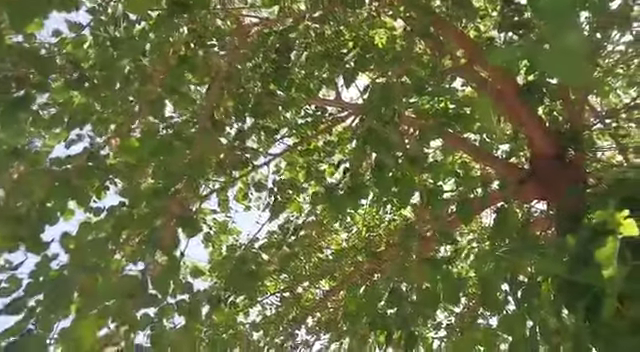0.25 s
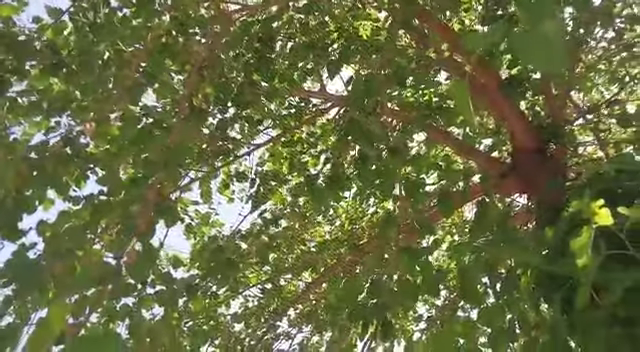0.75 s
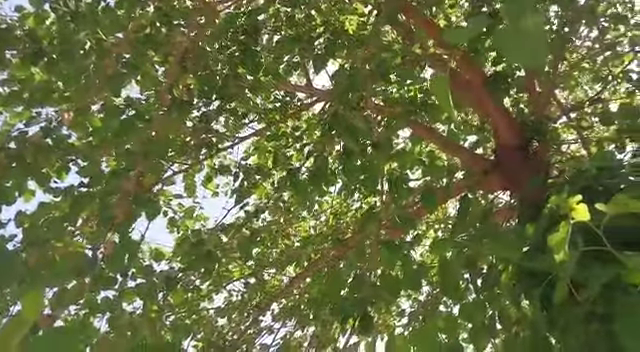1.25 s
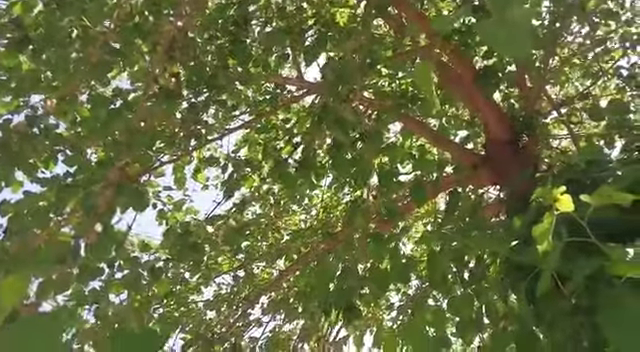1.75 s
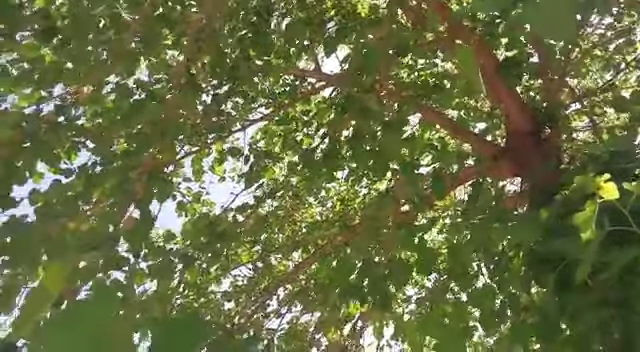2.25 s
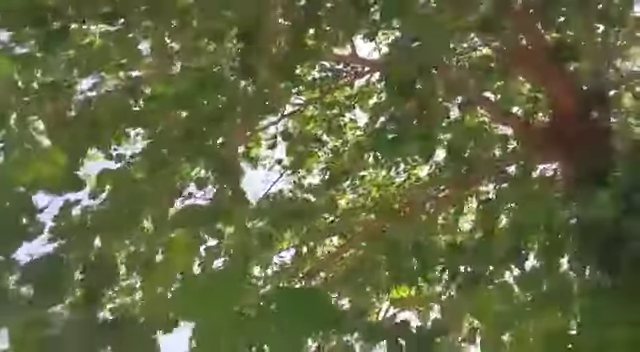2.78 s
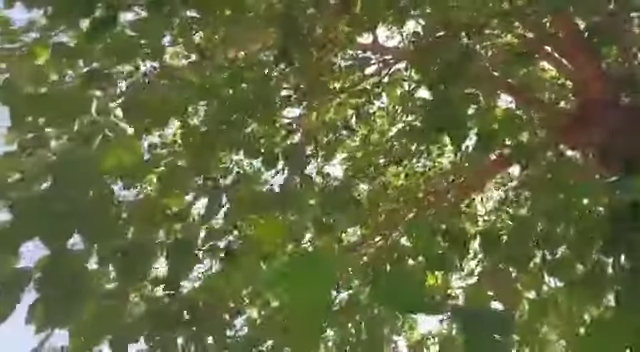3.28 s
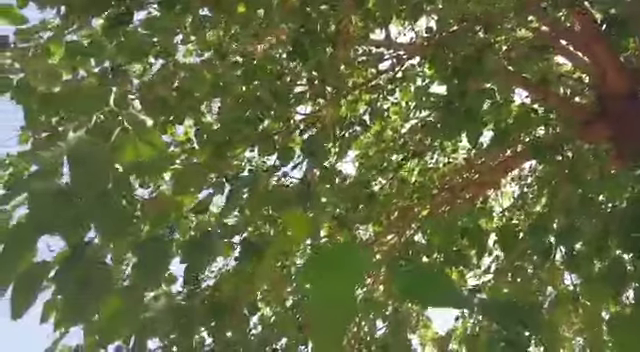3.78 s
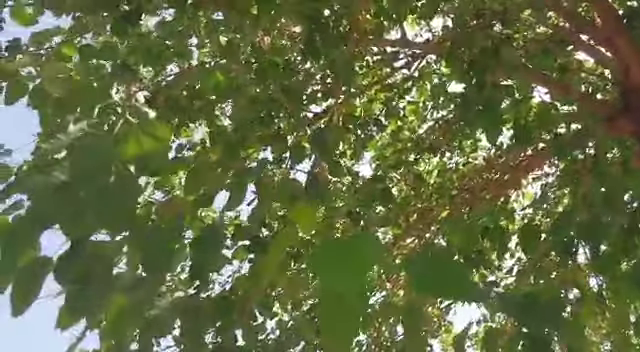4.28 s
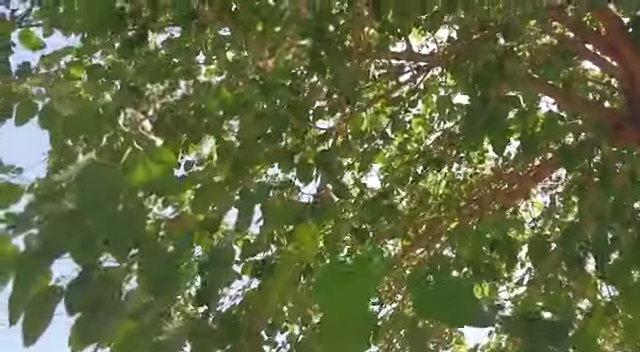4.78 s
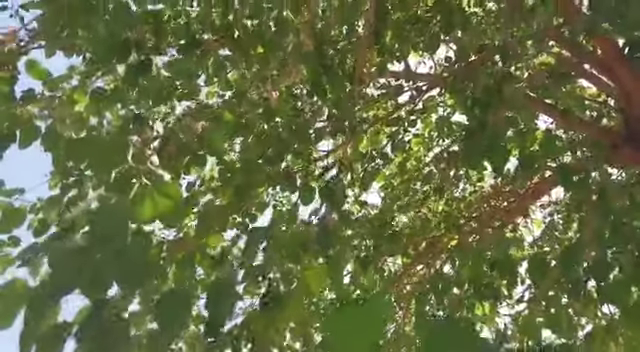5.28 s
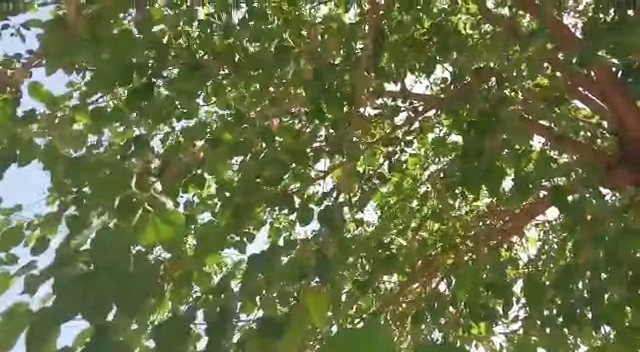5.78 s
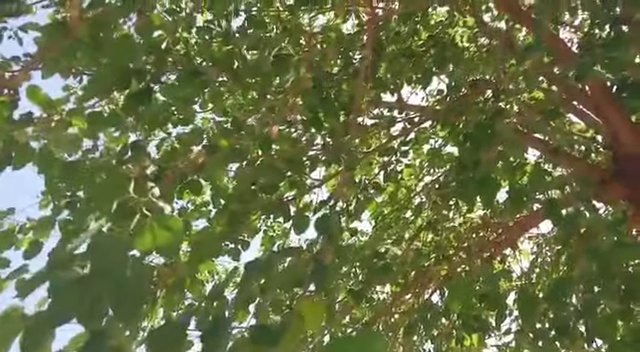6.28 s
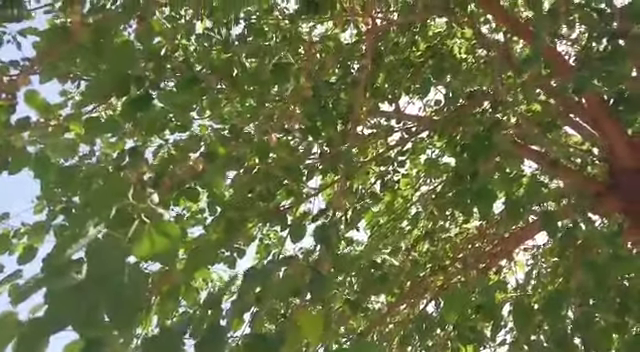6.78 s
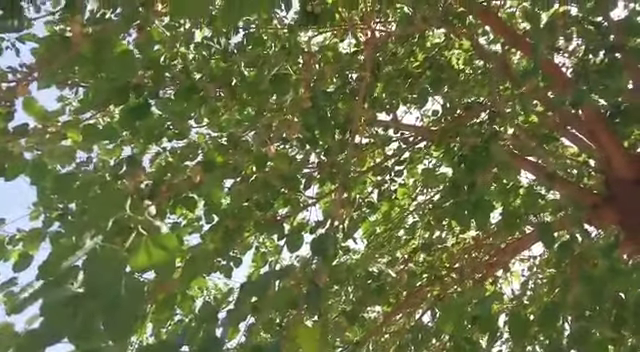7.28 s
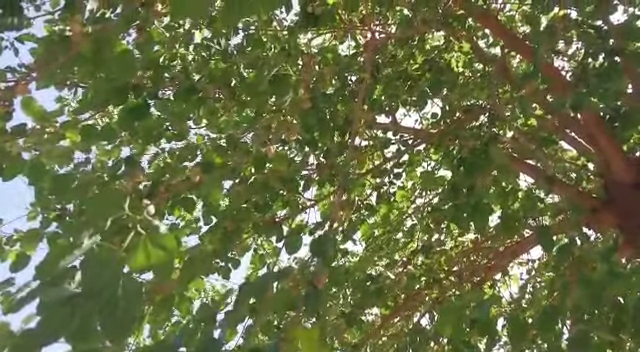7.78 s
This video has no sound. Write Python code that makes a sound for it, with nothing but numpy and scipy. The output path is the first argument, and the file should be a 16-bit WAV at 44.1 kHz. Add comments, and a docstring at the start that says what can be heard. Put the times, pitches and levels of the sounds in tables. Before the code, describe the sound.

Outdoors under a leafy tree, small birds such as sparrows call throughout. Loud, quick, buzzy chirrups stand out at irregular gaps, between softer chips, double chirps and thin high peeps. A far flock twitters in faint waves, and one bird holds a weak thin whistle midway. Distant town rumble with light airy hiss lies underneath. Stereo pickup, nearest birds close and clear, with short leafy echoes.

```python
"""A far flock chatters over a town's low rumble, with thin calls; soon sparrows chirp loudly in a leafy tree.
Each chirp is a zigzag whistle, most with an upper line, plus weak overtones and a rasp of breath noise.
Twigs, leaves and walls scatter the chirps as showers of small echoes; one bird holds a long thin whistle.
The flock is thousands of short random glides, and the town is coloured noise, all heard at two ports."""
import sys
import numpy as np
from scipy import signal
from scipy.fft import rfft, irfft
from scipy.io import wavfile
from scipy.ndimage import uniform_filter1d

SR = 44100
rng = np.random.default_rng(int(sys.argv[2]) if len(sys.argv) > 2 else 0)


def linear_from_db(decibels):
    """Turn decibels (scalar or array-like) into linear amplitude factors; 0 gives 1."""
    return 10 ** (np.asarray(decibels, float) / 20)


def to_wav(s):
    """Save 16-bit WAV."""
    ch = np.atleast_2d(s).T  # columns
    pcm = np.round(np.clip(ch, -1, 1) * 32767)  # PCM
    wavfile.write(sys.argv[1], SR, pcm.astype(np.int16))


N = 355005  # length in samples

# the held whistle, before its wavering: (t/s, f/Hz, level/dB)
HELD = [(4.44, 3380, -70), (4.6, 3430, -70), (4.85, 3435, -68), (5.1, 3430, -68), (5.32, 3450, -69),
        (5.42, 3450, -74)]
# the far flock, before each note's own random lift: (t/s, level/dB)
FLOCK = [(0, -50.5), (.25, -49.5), (.4, -76), (1.2, -53.5), (1.55, -78.5), (2.05, -54.5), (2.78, -66),
         (3.15, -56.5), (3.36, -70.5), (3.8, -53.5), (4.4, -68.5), (4.72, -54), (5.15, -58), (5.3, -56.5),
         (6.15, -69.5), (6.3, -55), (7.2, -73), (7.42, -48.5), (7.75, -98), (8.05, -49)]
# the town: (t/s, level of the rumble before a small wander/dB, swell of the hiss above 850 Hz/dB)
TOWN = [(0.0, -54.5, 4), (1.86, -55, 6), (1.9, -52, 6), (3.09, -56, 1.5), (3.56, -54, 2.5),
        (4.71, -56.5, 1.5), (4.87, -49.5, -8), (5.0, -56, -0.5), (7.71, -56.5, 2.5), (8.05, -51.5, -2)]
# tone colour of the town, before its overall level is set: (f/Hz, level/dB)
TOWN_COLOUR = [(15, -62), (25, -13), (45, -2), (110, 1), (220, -0.5), (340, -10.5), (600, -7), (800, -23),
               (1250, -31), (1600, -25), (2000, -34.5), (4000, -25.5), (8000, -48.5), (11000, -47),
               (16000, -48)]
# how alike the town is at both ports: (f/Hz, correlation from 0 to 1)
TOWN_LIKENESS = [(30, 0.75), (60, 0.81), (130, 0.92), (290, 0.58), (640, 0.0068)]
# sideways balance of the town: (f/Hz, left minus right/dB)
TOWN_BALANCE = [(60, -0.5), (380, -3), (1290, -7), (2380, -3), (8000, 2.5)]
# colour of the birds' rasp and overtones: (f/Hz, level/dB)
BIRD_TREBLE = [(2000, -27), (3500, -15.5), (5500, -12), (7200, -12), (8400, -28), (11200, -13.5),
               (13000, -22), (15500, -16.5)]
# second to fourth partial, before distance and the colour of the treble: level/dB
OVERTONES_DB = [-15, -8, -17]

# contours of the main line (MAIN) and of an upper line (SECOND): in the chirrup, the octave of its
# rising onset; elsewhere perhaps a second voice. Before each call's own pitch and level:
# (t from the call's start/s, f/Hz, level/dB)
CHIRRUP_MAIN = [(-.024, 2050, -46), (-.002, 2450, -40), (.005, 2950, -24), (.011, 4250, -9),
                (.021, 4700, -4), (.026, 5100, -3), (.032, 3400, -10), (.040, 3680, -2), (.046, 3680, -2),
                (.051, 3100, -10), (.056, 3800, 0), (.062, 3900, -1), (.067, 2800, -16), (.076, 2900, -14),
                (.084, 3380, -6), (.093, 3650, 0), (.098, 4100, -4), (.107, 2850, -8), (.114, 3300, -6),
                (.122, 2800, -18), (.129, 2950, -11), (.135, 2550, -20)]
CHIRRUP_SECOND = [(-.045, 4025, -35), (-.026, 4220, -17), (-.010, 4600, -4.5), (.002, 5300, -9.5),
                  (.009, 6115, 5)]
DOUBLE_MAIN = [(.003, 3200, -22), (.008, 3950, -10), (.016, 4330, 0), (.020, 4700, -1), (.026, 3650, -5),
               (.035, 3330, -4), (.042, 2800, -14), (.048, 2700, -16), (.056, 3120, -5), (.062, 3500, -5),
               (.068, 3000, -4), (.074, 2700, -10), (.080, 2350, -18)]
DOUBLE_SECOND = [(-.012, 3890, 4), (-.002, 5350, 7.5), (.006, 6200, -34.5)]
CHIP_MAIN = [(.002, 3350, -5), (.010, 4000, -23), (.018, 4805, -1.5), (.024, 4800, -19), (.031, 3747, -9.5),
             (.040, 3290, -14.5), (.047, 2750, -29), (0.06, 2680, -19), (0.076, 2514, -36)]
CHIP_SECOND = [(-.010, 4150, -6), (-.001, 5530, -0.5), (.006, 6600, -1)]
CHURR_MAIN = [(.004, 3180, -15), (.010, 4200, -1.5), (.018, 4500, -21.5), (.024, 4150, 1.5),
              (0.031, 3650, -2), (.042, 3150, -23), (0.055, 2990, -11), (0.072, 2540, -38)]
CHURR_SECOND = [(-.014, 4370, -29), (.000, 5800, -8), (.008, 4750, -18.5), (.016, 5087, -6),
                (.026, 4413, -1), (.036, 4170, -7.5), (.046, 3808, -11.5), (0.059, 3500, -9),
                (.070, 3130, -10)]
ANSWER_MAIN = [(-.004, 3300, -18), (.006, 4650, -7), (.018, 5300, -6), (.027, 3950, -3), (.040, 4300, -2),
               (.048, 4750, -5), (.056, 3300, -7), (.070, 3950, 0), (.085, 4850, -8), (.093, 3350, -6),
               (.103, 3550, -6), (.114, 2800, -13)]
ANSWER_SECOND = [(-.022, 5470, 3), (-.006, 6050, -15.5), (.002, 4760, -25), (.010, 5700, -0.5),
                 (0.022, 5610, -7)]
ARCH_MAIN = [(.002, 1837, -23.5), (.028, 2300, -5), (.046, 2900, -17), (0.058, 3400, -14),
             (0.07, 2766, -6.5), (.090, 2520, -2), (.112, 2355, 4.5), (.132, 2110, -11.5)]
LONG_MAIN = [(-.012, 4300, -16), (.012, 4500, 0), (.032, 3800, -2), (.055, 3300, -5), (.075, 2600, -15),
             (.092, 4000, -7), (.108, 2900, -11), (.130, 3550, -7), (.150, 2650, -15)]
LONG_SECOND = [(-.045, 5800, -8), (-.020, 5000, -4), (.030, 4300, 0), (.065, 3800, 0), (.085, 3400, -8)]
PEEP_MAIN = [(0, 6000, 1.5), (0.015, 6150, -7.5), (.030, 6110, 6.5)]

# the calls of each kind: (t of start/s, main line level/dB, pitch as a share of the contour,
# upper line level/dB, phase by which left leads/rad, extra echo for a bird deep in the leaves/dB)
CHIRRUPS = [(.576, -27, 1.037, -36.5, 4.43, -1.5), (3.553, -30, 0.99, -40, 1.43, -1),
            (4.779, -26.5, 1.0, -34.5, 1.18, 0.5), (7.823, -28, 1.039, -39.5, 1.3, 0)]
DOUBLES = [(1.597, -31, 1.0, -47.5, -2.8, 2.6), (1.691, -32.5, 1, -56, -1.9, 0.94),
           (2.606, -48.5, .94, -61.5, 3.1, 8.8), (6.750, -29.5, 0.96, -53, 2.04, 1.2),
           (6.843, -30, .98, -44.5, 1.2, 0.47)]
CHIPS = [(1.381, -28, 0.99, -56.5, 0.96, 4), (2.493, -34.5, 0.98, -49, -1, 10.5)]
CHURRS = [(1.189, -51, 0.93, -50, 5.2, 10), (1.277, -37.5, 0.91, -34, 2, 4),
          (1.857, -33, .99, -36.5, 3.8, 6.2), (2.815, -36, 0.98, -37, 1.1, 4.8),
          (3.887, -33, 0.96, -35.5, 1.26, 3.3), (5.49, -60, 1, -75, 1.2, 6.6),
          (7.062, -37, 0.93, -37, 0.63, 2.1), (7.995, -45.5, .97, -57, 2.1, 8)]
ANSWERS = [(1.004, -45, 1.0, -57.5, 4, 4.8), (2.190, -42, 1.014, -58, 2, 5.2),
           (3.062, -62, 1.19, -76, -2.5, 4.4), (3.412, -45.5, 0.97, -47, 4, 3.4),
           (4.535, -57, .95, -73, 2.2, 4.8), (5.295, -53, 1.014, -62, 3.4, 8),
           (6.422, -52.5, 0.95, -67, 2.5, 5.6), (7.386, -72, 0.81, -79, 18.5, 2.4)]
ARCHES = [(2.340, -53.5, 0.99, 0, 1.4, 1), (4.560, -56.5, 1, 0, 0.98, 1.6), (7.410, -64, 1.0, 0, 4.7, 5)]
LONGS = [(.002, -49.5, 1.0, -50, 2, 4.9), (5.764, -51, .94, -59.5, -2.5, 8.4),
         (6.262, -65, 1.05, -74.5, 3, 5.1)]
PEEPS = [(.066, -61.5, 1.06, 0, 3.5, 5.9), (.450, -60, 1, 0, 4.5, 1), (.472, -58, 0.95, 0, 4.5, 1),
         (.526, -57, 0.99, 0, 4, 1), (.562, -48, 1.07, 0, 3.5, 0.87), (2.935, -61, 1.04, 0, -2.5, 1),
         (3.775, -66, 1.02, 0, 4, 6), (4.244, -62.5, 1.01, 0, 1, 8.6), (4.667, -62, 1.05, 0, 1.8, 2.7),
         (4.757, -49, 1, 0, 1.5, 1.1), (6.925, -59, 0.99, 0, 1, 2), (7.952, -48.5, 0.82, 0, 2.5, 0.7)]
SINGERS = [(CHIRRUPS, CHIRRUP_MAIN, CHIRRUP_SECOND, -0.24, 1.8),
           (DOUBLES, DOUBLE_MAIN, DOUBLE_SECOND, .2, 1), (CHIPS, CHIP_MAIN, CHIP_SECOND, .2, -1.5),
           (CHURRS, CHURR_MAIN, CHURR_SECOND, 0.45, -1.8), (ANSWERS, ANSWER_MAIN, ANSWER_SECOND, 3.8, -1.2),
           (LONGS, LONG_MAIN, LONG_SECOND, 2.4, .2), (ARCHES, ARCH_MAIN, None, -6.5, -4),
           (PEEPS, PEEP_MAIN, None, 0.89, .2)]

# shares a left-minus-right difference between the two ports
PORT_SIDES = np.array([[.5], [-.5]])
EDGE_S, ROUNDING_S = .004, .0015  # fade at the ends of a line; window that rounds the turns in pitch
BREAKS_DB, BREAKS_PER_S = 1.2, 220  # the voice catches: strength and rate of its level wander
UPPER_HOARSE = 1.9  # the upper line is this many times hoarser
OVERTONE_GRAIN, OVERTONE_PAN_DB = 0.8, -3.5  # overtones shiver and lean right
OVERTONE_DB_PER_DB = 0.6  # overtones fade faster than the whistle with distance
RASP_DB_PER_KHZ = 5  # high notes push more air
SLAP_S, SLAP_DB = .012, -17  # one firm echo off a trunk or wall
FLOCK_HZ = 3993  # pitch around which the flock's notes are spread


def curve(table, s, column=1):
    """Reads a table column at times s, with straight lines between the rows."""
    rows = np.array(table, float)
    return np.interp(s, rows[:, 0], rows[:, column])


def shape(points, size):
    """Reads (f/Hz, value) points at every bin of a transform, straight on a log-frequency axis."""
    rows = np.array(points, float)
    bin_hz = np.arange(size // 2 + 1) * SR / size
    return np.interp(np.log(bin_hz + 1), np.log(rows[:, 0]), rows[:, 1])


def walk(rate, size):
    """Random wander around 0 with spread near 1.5, heading for a new value rate times a second."""
    hold = max(int(SR / rate), 1)
    steps = np.repeat(rng.standard_normal(size // hold + 1), hold)
    return 1.84 * uniform_filter1d(steps, hold)[:size]


def add(out, start_s, sound):
    """Mixes a sound in at a time, cutting off what falls outside."""
    i = int(start_s * SR)
    sound = sound[..., max(-i, 0):out.shape[-1] - i]
    out[..., max(i, 0):max(i, 0) + sound.shape[-1]] += sound


def scatter(x, t60_s, db, rise_s):
    """Countless small echoes, different at each port, that build up and then die away exponentially."""
    s = np.arange(int(1.2 * SR)) / SR
    envelope = (1 - np.exp(-s / rise_s)) * linear_from_db(-60 * s / t60_s)
    echoes = rng.standard_normal((2, len(s))) * envelope
    echoes = echoes * linear_from_db(db) / np.sqrt(np.sum(echoes ** 2, axis=1, keepdims=True))
    return signal.fftconvolve(x[None], echoes, axes=1)[:, :N]


def glide(contour, share, strain):
    """A line's slightly unsteady pitch, its rise and fall in loudness, and its hoarse grain."""
    s = np.arange(contour[0][0], contour[-1][0], 1 / SR)
    hz = share * uniform_filter1d(curve(contour, s), max(int(ROUNDING_S * SR), 1))
    fade = np.minimum(1, np.minimum(s - s[0], s[-1] - s) / EDGE_S)
    breaks = linear_from_db(BREAKS_DB * walk(BREAKS_PER_S, len(s)))
    swell = linear_from_db(curve(contour, s, column=2)) * fade * breaks
    # the membranes beat unevenly, which spreads a haze around the line; strained high notes are hoarsest
    hoarse = strain * np.interp(hz, [2600, 4800, 5600], [.06, .11, .3])
    unsteady_hz = hz * (1 + hoarse / 18 * walk(300, len(s)))
    grain = 1 + hoarse * walk(900, len(s))
    return unsteady_hz, swell, grain


def whistle(hz, size, lead, overtones_db):
    """A near sine at both ports; left leads right by a phase that grows with the partial."""
    phase = 2 * np.pi * (np.cumsum(hz) / SR + rng.random()) + PORT_SIDES * lead
    tone = np.sin(phase)
    for k, db in enumerate(overtones_db, start=2):
        # silent where the partial would pass the top of the sampled range
        in_range = k * hz < .45 * SR
        shiver = (1 + OVERTONE_GRAIN * walk(1500, len(hz))) * in_range
        level_db = db + curve(BIRD_TREBLE, k * hz) + PORT_SIDES * OVERTONE_PAN_DB
        tone = tone + linear_from_db(level_db) * shiver * np.sin(k * phase)
    return np.sqrt(2) * size * tone


def sparrows():
    """Whistled calls: direct sound at the ports, the share sent to the surroundings, and throat air."""
    direct, sent, effort = np.zeros((2, N)), np.zeros(N), np.zeros(N)
    for calls, main, upper, pan_db, rasp_db in SINGERS:
        for start, main_db, share, upper_db, lead, echo_db in calls:
            lines = [(main, main_db, 1)]
            if upper:
                lines.append((upper, upper_db, UPPER_HOARSE))
            for contour, db, strain in lines:
                hz, swell, grain = glide(contour, share, strain)
                overtones_db = np.add(OVERTONES_DB, OVERTONE_DB_PER_DB * (db + 24.5))
                tone = whistle(hz, swell * grain, lead, overtones_db)
                khz_above = (hz - 3900) / 1000
                # high pitches lean right, low ones left
                lean_db = pan_db - 1.5 * khz_above
                when = start + contour[0][0]
                add(direct, when, tone * linear_from_db(db + PORT_SIDES * lean_db))
                add(sent, when, tone[0] * linear_from_db(db + echo_db))
                add(effort, when, swell * linear_from_db(db + rasp_db + RASP_DB_PER_KHZ * khz_above))
    return direct, sent, effort


def rasp(effort):
    """Air hissing through the throat with the whistle, growing faster than it; leaves scatter it too."""
    puff = np.abs(uniform_filter1d(effort, size=800)) ** 1.033
    hiss = irfft(rfft(rng.standard_normal(N)) * linear_from_db(shape(BIRD_TREBLE, N)), N)
    air = linear_from_db(-2.5) * puff * hiss
    # it reaches the right port a little louder and a sample earlier
    at_ports = np.array([np.roll(air, shift=1), air])
    return (at_ports + scatter(air, t60_s=0.15, db=-1.96, rise_s=0.0056)) * linear_from_db([[-3.5], [0]])


def held_whistle():
    """One thin, wavering long note with a clear octave, a little way off among its echoes."""
    s = np.arange(HELD[0][0], HELD[-1][0], 1 / SR)
    fade = np.minimum(1, np.minimum(s - s[0], s[-1] - s) / 0.035)
    size = fade * linear_from_db(curve(HELD, s, column=2) + 2 * walk(30, len(s)))
    hz = curve(HELD, s) * (1 + 0.006 * walk(44, len(s)))
    out = np.zeros((2, N))
    add(out, s[0], whistle(hz, size, lead=0.41, overtones_db=[-6]))
    return out + scatter(out[0], t60_s=.3, db=-6, rise_s=.004)


def flock(count):
    """Very many random arched glides of far birds, around a common pitch."""
    when, pitch, bend, fall, loud = rng.random((count, 5)).T[..., None]
    u = np.linspace(0, 1, 900)  # place within a note, which lasts 900 samples
    hz = FLOCK_HZ * 2 ** (.45 * (pitch + bend - 1))
    hz = hz * (1 + .5 * bend * u * (1 - u) - 0.274 * fall * u)
    level = linear_from_db(8.05 * loud + curve(FLOCK, when * N / SR))
    notes = np.sin(np.pi * u) * level * np.sin(2 * np.pi * np.cumsum(hz, axis=1) / SR)
    # sum all notes at their places in time
    places = (when * N).astype(int) + np.arange(len(u))
    out = np.bincount(places.ravel(), notes.ravel(), minlength=N)[:N]
    return out / np.sqrt(count * len(u) / N)


def town():
    """Far traffic and air as coloured noise: bass much alike at both ports, treble unrelated."""
    s = np.arange(N) / SR
    like = np.clip(shape(TOWN_LIKENESS, N), 0, 1)
    mid, side = rfft(rng.standard_normal((2, N)))
    ports = np.sqrt(1 + like) * mid + np.sqrt(1 - like) * side * np.array([[1], [-1]])
    colour_db = shape(TOWN_COLOUR, N) + PORT_SIDES * shape(TOWN_BALANCE, N)
    ports = irfft(ports * linear_from_db(colour_db), N)
    ports = ports / np.sqrt(np.mean(ports ** 2))
    # split at 850 Hz so that rumble and hiss swell separately
    rumble = signal.sosfiltfilt(signal.butter(4, 850, fs=SR, output="sos"), ports)
    hiss = ports - rumble
    rumble_db = curve(TOWN, s) + walk(12, N)
    hiss_db = -54.5 + curve(TOWN, s, column=2)
    return rumble * linear_from_db(rumble_db) + hiss * linear_from_db(hiss_db)


def scene():
    """Birds, their echoes from twigs, leaves and walls, the flock and the town."""
    direct, sent, effort = sparrows()
    # the firm echo has opposite sign at the two ports
    slap = linear_from_db(SLAP_DB) * np.roll(sent, int(SLAP_S * SR)) * np.array([[1], [-1]])
    twigs = scatter(sent, t60_s=.05, db=-15, rise_s=.002)
    # trembling foliage smears each pitch into a band
    leaves = scatter(sent * walk(300, N), t60_s=0.071, db=-7, rise_s=0.0068)
    walls = scatter(sent * walk(900, N), t60_s=0.41, db=-16, rise_s=0.018)
    far = scatter(flock(count=2500), t60_s=0.37, db=-2.5, rise_s=0.0011)
    return direct + slap + twigs + leaves + walls + rasp(effort) + held_whistle() + far + town()


def top_cut(x):
    """Nothing passes above the cut-off."""
    return signal.sosfilt(signal.butter(12, 15880, fs=SR, output="sos"), x)


def record(dry):
    """Turns the finished mix of birds and town into the sound that is written out."""
    return top_cut(dry)


dry = scene()
out = record(dry)
to_wav(out)
```